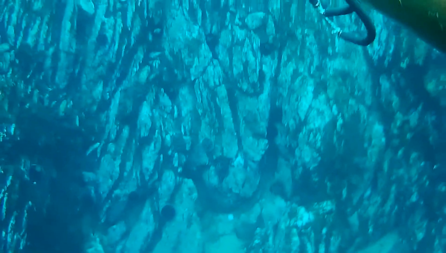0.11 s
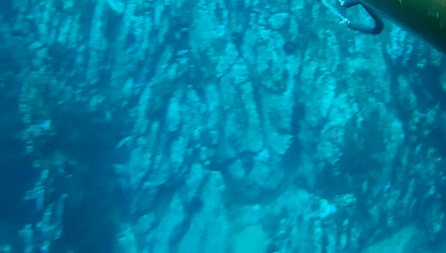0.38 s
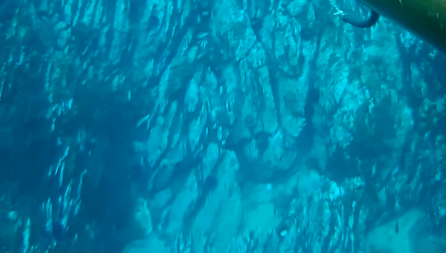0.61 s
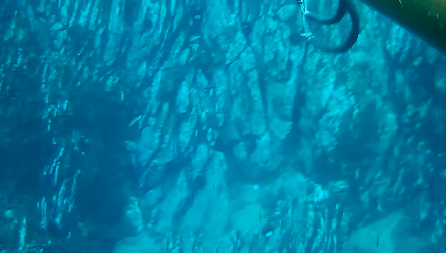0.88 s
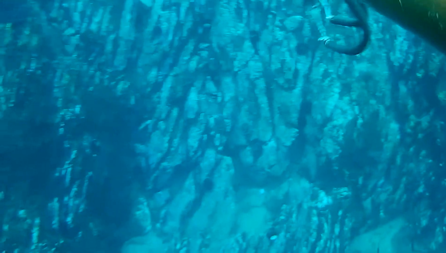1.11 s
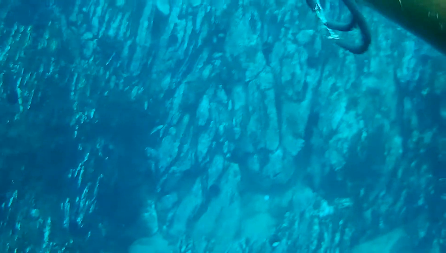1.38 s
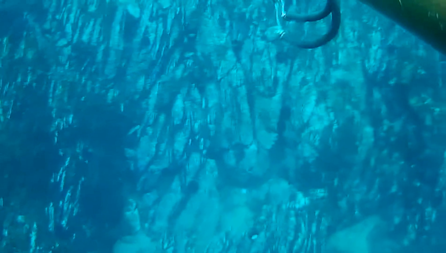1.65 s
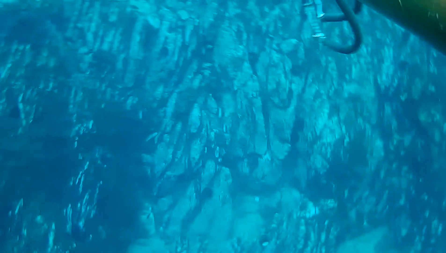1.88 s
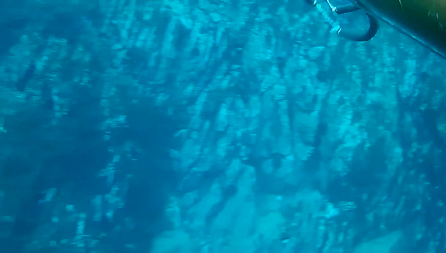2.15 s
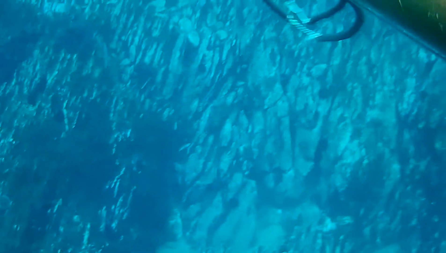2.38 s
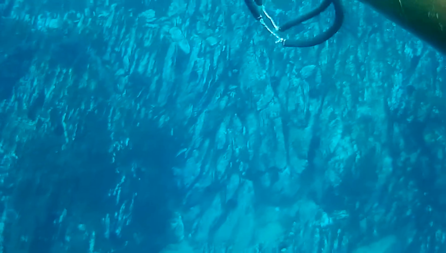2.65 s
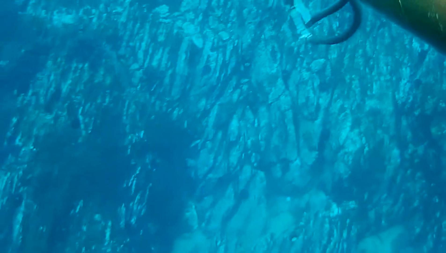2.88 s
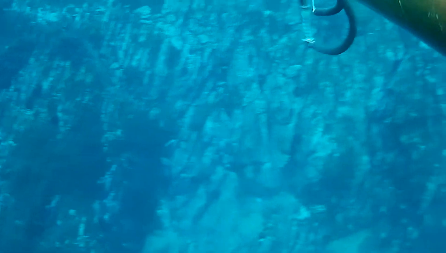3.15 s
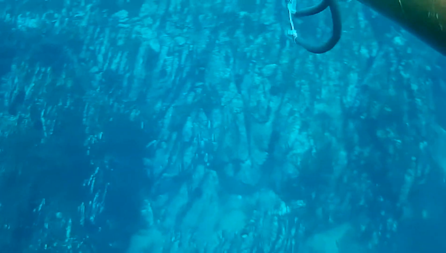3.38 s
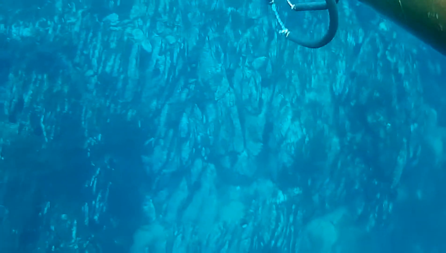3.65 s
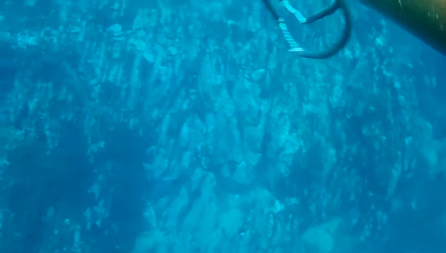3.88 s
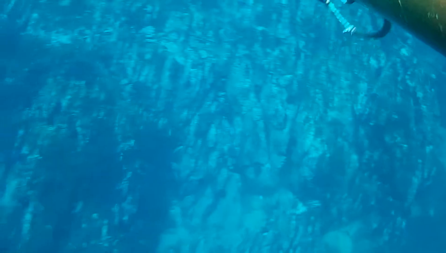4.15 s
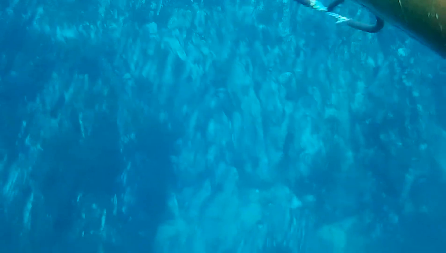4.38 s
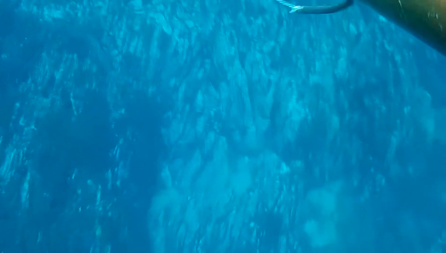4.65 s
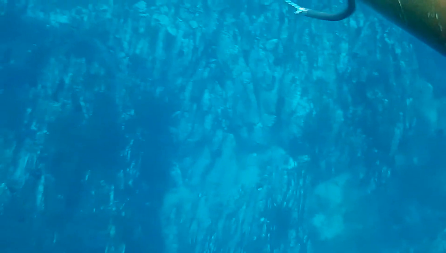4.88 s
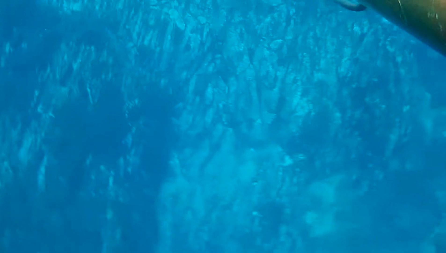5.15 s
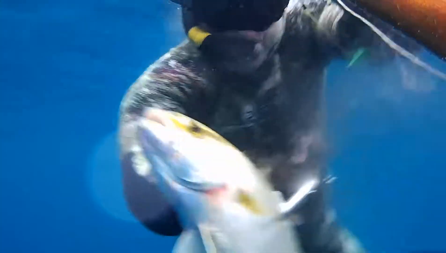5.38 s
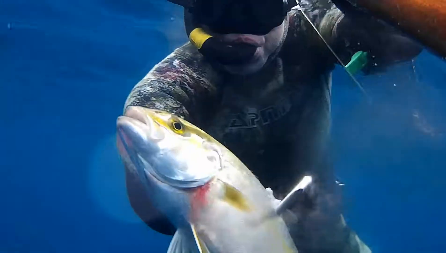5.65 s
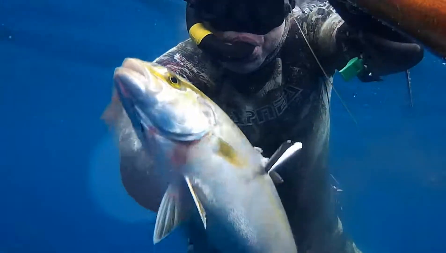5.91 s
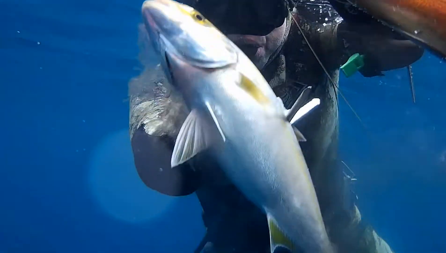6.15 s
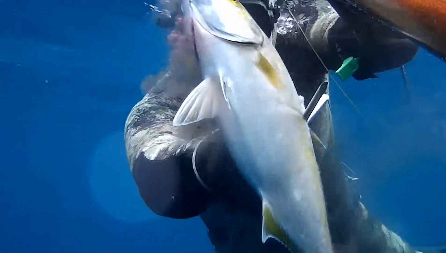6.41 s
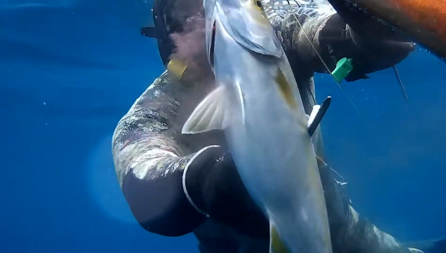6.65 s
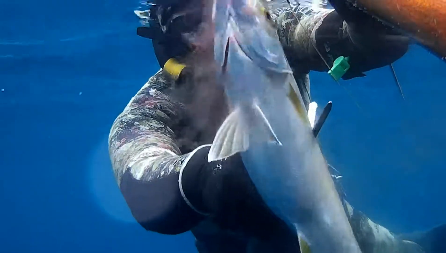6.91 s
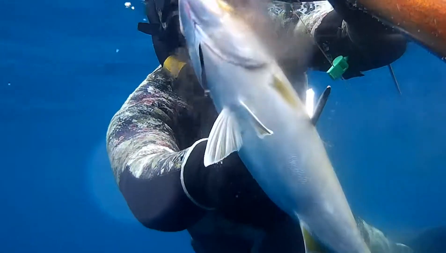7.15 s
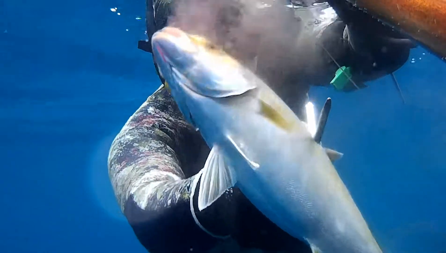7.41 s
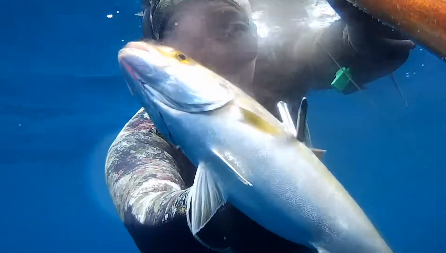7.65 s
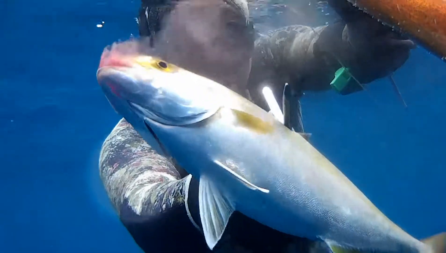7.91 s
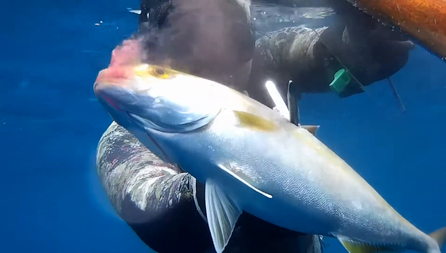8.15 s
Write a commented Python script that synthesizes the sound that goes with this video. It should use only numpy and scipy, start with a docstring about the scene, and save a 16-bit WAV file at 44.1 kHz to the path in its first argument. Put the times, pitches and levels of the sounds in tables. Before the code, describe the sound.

Muffled underwater handling of a wooden speargun: low barrel hum, rubbing line and gloves, dull knocks, short ratchety scrapes and small bubbles, then near quiet.

```python
"""Under water, a small camera in a sealed case is clamped to a wooden speargun, so its microphone rides the barrel.
From the start a faint wash of sea and a faint, evenly throbbing hiss lie under everything, the long barrel sways
with a low hum as the diver tugs the line, line and gloves rub it, and knocks ring its modes; small fittings soon tick.
From about 0.65 s air bubbles out now and then and the line ratchets over the barrel in short bursts; a lone click
falls at 5.15 s. After 5.7 s the tugs cease and the sway calms; past 6.4 s only faint rubs, knocks and ticks remain."""
import sys
import numpy as np
from scipy import signal
from scipy.fft import rfft, irfft
from scipy.io import wavfile
from scipy.ndimage import uniform_filter1d

SR = 44100
rng = np.random.default_rng(int(sys.argv[2]) if len(sys.argv) > 2 else 0)


def volts(x):
    """Linear amplitude factor 10**(x/20) for a level x in dB, scalar or array-like."""
    e = np.asarray(x, float) / 20
    return 10 ** e


def to_wav(sig):
    """Store sig (one row per channel, or 1-D mono) as 16-bit WAV at the path in sys.argv[1].

    Samples outside -1..1 are clipped; the rate is SR.
    """
    pcm = np.clip(np.atleast_2d(sig), -1, 1) * 32767
    pcm = np.round(pcm).astype(np.int16)
    wavfile.write(sys.argv[1], SR, pcm.T)  # frames by channels


N = 365148
T = np.arange(N) / SR


def level(x, db):
    """Scale to an rms level."""
    return x * volts(db) / np.sqrt(np.mean(x ** 2))


def walk(rate):
    """Random levels held 1 / rate s and slewed twice; spread near 1."""
    hold = int(SR / rate)
    steps = np.repeat(rng.standard_normal(N // hold + 1), hold)
    return 1.7 * uniform_filter1d(uniform_filter1d(steps, hold), hold)[:N]


def coloured(spectrum):
    """Noise shaped by a spectrum of (pitch_hz, density_db) points."""
    hz, db = np.transpose(spectrum)
    bins_hz = np.arange(N // 2 + 1) * SR / N + 1
    gain = volts(np.interp(np.log(bins_hz), np.log(hz), db))
    return irfft(rfft(rng.standard_normal(N)) * gain, N)


def ring(force, hz, t60):
    """One mode driven by a force; a unit blow rings with peak near 1 and falls 60 dB in t60 s."""
    radius = 1000. ** (-1 / (t60 * SR))
    turn = 2 * np.pi * hz / SR
    return signal.lfilter([0, np.sin(turn)], [1, -2 * radius * np.cos(turn), radius * radius], force)


def soft(force, top_hz):
    """Water and rubber round off every contact: a gentle low-pass."""
    return signal.sosfilt(signal.butter(2, top_hz, fs=SR, output="sos"), force)


def swells(start, held, db, attack, fade_db_s):
    """Gain over time of efforts that rise, hold and fade; their powers add."""
    power = np.zeros(N)
    for s, h, peak_db in zip(start, held, db):
        rise = np.clip((T - s) / attack, 0, 1) if s > 0 else 1  # an effort at 0 s is already up
        fade_db = fade_db_s * np.clip(T - s - attack - h, 0, 2)
        power += (rise * volts(peak_db - fade_db)) ** 2
    return np.sqrt(power)


def add(out, s, sound):
    """Mix a short sound in at a time."""
    i = int(s * SR)
    out[i:i + len(sound)] += sound[:N - i]


# wash of the open water around the gun: pitch_hz, density_db (relative)
WATER_SPECTRUM = [(24, -26), (50, -15), (155, -14), (302, -21.5), (440, -11), (514, -18.5), (749, -38.5),
                  (3000, -39), (3900, -39), (6600, -120)]


def sea():
    """Coloured noise whose strength wanders slowly, as water moving around the case."""
    return level(coloured(WATER_SPECTRUM) * volts(1.7 * walk(5.2)), -65)


# faint hiss over everything: pitch_hz, density_db (relative)
HISS_SPECTRUM = [(880, -4), (1500, -1.5), (1820, -3.5), (2090, -5.5), (14100, -8), (15500, -11)]


def faint_hiss():
    """Faint coloured noise, constant on the whole, with a small even throb about 21.5 times a second."""
    throb_hz = SR / 2048
    throb_db = 1.23 * np.tanh(10.0 * np.cos(2 * np.pi * throb_hz * (T - .0147)))
    return level(coloured(HISS_SPECTRUM) * volts(throb_db), -71)


# tugs on the line that bend the barrel: start_s, held_s, first_bending_db, second_bending_db
LINE_TUGS = [(0.0, 0.17, -36, -41.5), (0.419, 0.23, -33.5, -48.5), (0.78, 0.071, -36, -41),
             (1, 0.23, -36.5, -40), (1.331, 0.087, -30, -42), (1.569, 0.3, -30, -52),
             (2.72, 0.11, -43, -52), (2.86, 0.15, -34.5, -45.5), (3.17, 0.49, -42.5, -50.5),
             (4.17, 0.2, -41.5, -51.5), (4.99, 0.03, -37, -43.5), (5.142, 0.07, -26.5, -43),
             (5.27, 0.028, -28.5, -45), (5.57, 0.069, -37.5, -44), (5.71, 0.023, -43, -59)]


def sway():
    """Tugs set off two bending modes: the first wavers over a dull surge, the second is shaken unevenly."""
    first_hz, second_hz = 38.2, 73.45
    attack_s, first_fade_db_s, second_fade_db_s = 0.017, 96, 52
    start, held, first_db, second_db = np.transpose(LINE_TUGS)

    phase = 2 * np.pi * np.cumsum(first_hz * (1 + 0.0602 * walk(6.2))) / SR
    first = np.sqrt(2) * volts(1.5 * walk(14)) * np.sin(phase)
    surge = level(soft(ring(rng.standard_normal(N), 44.0, 0.1), 60), -13.0)
    second = level(ring(rng.standard_normal(N), second_hz, 0.63), 0)
    drift = level(soft(ring(rng.standard_normal(N), first_hz, 0.26), 70), -0.53)

    # between tugs the barrel sways a little, less and less once the diver calms down at 5.69 s
    idle = volts(-47.5 - 5 * np.maximum(T - 5.69, 0))
    bend = swells(start, held, first_db, attack_s, first_fade_db_s)
    tugged = swells(start, held, second_db, attack_s, second_fade_db_s)
    shake = np.hypot(tugged, idle * volts(-12.5))
    return bend * (first + surge) + idle * drift + shake * second


# modes of gun and case, before each contact weights them: pitch_hz, level_db (relative), t60_s
BODY_MODES = [(129, -19.5, 0.045), (164, -22, 0.23), (223, -13, 0.18), (282.9, -7, 0.21), (347, 2.5, 0.15),
              (437.1, -3, 0.2), (509.5, -8.5, 0.14), (610.3, -12, 0.048), (691, -13.5, 0.028),
              (792, -14.5, 0.045), (888, -17, 0.028), (1011, -30.5, 0.11), (1290, -16, 0.011),
              (1450, -28, 0.029), (1678, -25.5, 0.029), (1960, -39.5, 0.046), (2520, -38, 0.013),
              (3150, -28, 0.006), (3730, -39.5, 0.013)]
# strokes of line and gloves along the gun: start_s, held_s, effort_db, scratch_db (upper modes, on top of effort)
GLOVE_STROKES = [(0.0, 0.019, -37, -13), (0.13, 0.021, -42.5, -9.5), (0.22, 0.14, -46.5, -22),
                 (0.42, 0.27, -53, -13.5), (0.68, 0.28, -45.5, -5.5), (1.05, 0.65, -41, -17),
                 (1.8, 0.13, -45.5, -13), (1.98, 1.57, -58, -7), (2.722, 0.16, -48, -9.5),
                 (2.87, 0.12, -42, -14), (3.1, 0.34, -50.5, -8), (3.55, 0.42, -58.5, -5.5),
                 (3.96, 0.12, -51, -14), (4.31, 0.23, -60.5, 1.5), (4.5, 0.47, -58.5, -4.5),
                 (4.97, 0.088, -46, -5), (5.13, 0.24, -43, -19), (5.36, 0.17, -45, -8.5),
                 (5.6, 0.27, -55.5, -14), (5.97, 0.33, -52, -16), (6.4, 1.9, -76, 0.5)]
# each way of holding the gun frees other modes: from_s, mode_440_hz_db, mode_515_hz_db
HOLDS = [(0, -1, -11.5), (3.45, 9.5, -20.5), (5.05, -2.5, 6), (6.45, 9, -15)]


def rub():
    """Stick-slip grains in uneven bunches push every mode; the upper ones get sparser, harder slips."""
    attack_s, fade_db_s, regrip_s = 0.03, 108, 0.19
    start, held, effort_db, scratch_db = np.transpose(GLOVE_STROKES)
    since, *columns = np.transpose(HOLDS)
    hold = np.searchsorted(since, T, side="right") - 1
    freed = [uniform_filter1d(c[hold], int(regrip_s * SR)) for c in columns]
    freed_db = dict(zip((5, 6), freed))  # rows of the two modes in BODY_MODES

    bunches = volts(2.4 * walk(30))
    dense = rng.standard_normal(N) * volts(2.45 * np.minimum(rng.exponential(size=N), 6.5)) * bunches
    sparse = rng.standard_normal(N) * volts(3.55 * np.minimum(rng.exponential(size=N), 6)) * bunches
    # the highest modes answer only to the sharpest slips, so they crackle
    crackle = volts(3.5 * np.clip(walk(70), -2, 2))

    low, high = np.zeros(N), np.zeros(N)
    for k, (hz, mode_db, t60) in enumerate(BODY_MODES):
        patchy = volts(2.97 * walk(10))  # the touching point wanders over the mode shapes
        if hz > 560:
            slips = sparse * (crackle if hz > 1100 else 1)
            high_db = mode_db - 5 * (hz > 1100) - 6 * (hz > 2300)
            high += patchy * level(ring(soft(slips, 1.19 * hz), hz, t60), high_db)
        else:
            mode = level(ring(soft(dense, 1.28 * hz), hz, t60), mode_db)
            low += patchy * mode * volts(freed_db.get(k, 0))

    press = swells(start, held, effort_db, attack_s, fade_db_s)
    scratch = swells(start, held, effort_db + scratch_db, attack_s, fade_db_s)
    return press * volts(-6) * low + scratch * level(high, 0)


def blow(gains_db, rise, chance, lasting=1):
    """A contact: all modes swell in together, slightly detuned, each with its own strength; peak 1."""
    hz, _, t60 = np.array(BODY_MODES).T[:, :, None]
    t = np.arange(int(.3 * SR)) / SR
    phase = 2 * np.pi * hz * (1 + 0.014 * chance[0, :, None]) * t
    strength = volts(gains_db + 4.4 * chance[1])[:, None]
    rings = strength * np.sin(phase) * 1000. ** (-t / (lasting * t60))
    swell = np.sin(np.pi / 2 * np.clip(t / max(rise, 2e-4), 0, 1)) ** 2
    sound = rings.sum(axis=0) * swell
    return sound / np.abs(sound).max()


# dull knocks on the barrel (each swells in from 4 ms before its time):
# time_s, peak_db, favoured_mode_hz, hardness_db
DULL_KNOCKS = [(0.055, -33, 346, -29), (0.154, -30.5, 331, -19.5), (0.192, -28.5, 352, -11.5),
               (0.435, -45, 852, -20), (0.641, -40.5, 437, -18.5), (0.924, -35, 346, -33),
               (0.999, -33.5, 362, -31), (1.081, -33.5, 347, -37), (1.153, -29, 346, -23),
               (1.187, -33, 355, -23), (1.231, -28.5, 345, -43.5), (1.305, -38.5, 347, -12),
               (1.344, -34, 359.4, -16.5), (1.427, -30.5, 347, -14.5), (1.537, -40, 436, -22),
               (1.804, -26, 347, -32), (1.922, -28, 367, -20), (2.886, -23, 347, -16),
               (2.986, -30, 347, -15), (3.13, -45.5, 347, -33), (3.187, -45, 346, -27),
               (3.224, -40.5, 347, -21), (3.305, -33.5, 330, -33), (3.38, -34.5, 457, -17.5),
               (3.537, -36.5, 438, -18.5), (3.793, -38.5, 270, -21.5), (4.214, -36, 440, -43),
               (4.32, -26.5, 437, -36.5), (4.475, -42, 440, -38), (4.515, -32, 327, -19.5),
               (4.702, -42, 863, -20), (4.728, -38.5, 437, -25), (4.944, -39, 352, -36),
               (5.009, -39, 345, -20), (5.094, -26, 325, -37.5), (5.154, -33.5, 126.5, -31),
               (5.278, -35.5, 484.5, -27), (5.524, -35.5, 353, -44), (5.93, -46.5, 352, -10),
               (5.991, -34.5, 534.4, -34.5), (6.076, -40, 502, -17.5), (6.137, -38.5, 530, -27.5),
               (6.261, -43.5, 440, -38), (6.383, -31.5, 492, -18.5), (6.403, -66, 445, -4),
               (7.274, -48.5, 347, -13), (7.466, -50.5, 308, -22), (8.078, -46, 347, -9.5)]


def knocks():
    """A knock's place favours one mode, most if soft; a harder one is quicker, brighter and dies sooner."""
    out, (hz, db, _) = np.zeros(N), np.transpose(BODY_MODES)
    chances = rng.standard_normal((len(DULL_KNOCKS), 2, len(BODY_MODES)))
    for (s, peak_db, near_hz, hard_db), chance in zip(DULL_KNOCKS, chances):
        place_db = (5.5 - 0.99 * hard_db) * np.exp(-(np.log(hz / near_hz) / 0.051) ** 2)
        place_db -= 15 * (near_hz > 600) * (hz < 560)  # a small loose part leaves the barrel still
        bright_db = (hz > 560) * (hard_db + 39) - 15 * (hz > 2300)
        rise = 0.0034 * volts(-.4 * hard_db)
        lasting = volts(-0.15 * (hard_db + 32))
        add(out, s - .004, volts(peak_db) * blow(db + place_db + bright_db, rise, chance, lasting))
    return out


def gritty(sound, length):
    """A contact that chatters for a moment: the sound is struck many times, fading; peak 1."""
    t = np.arange(int(.06 * SR)) / SR
    chatter = rng.standard_normal(len(t)) ** 3 * np.exp(-t / max(length, 1e-4))
    out = signal.fftconvolve(sound, chatter)[:len(sound)]
    return out / np.abs(out).max()


# ticks of small fittings, save the row at 5.1532 s: a lone click that is no fitting, made the same way
# (each starts 1.2 ms before its time): time_s, peak_db, favoured_mode_hz, top_end_db
TICKS_AND_CLICK = [(0.1876, -49, 1220, -23), (0.601, -46, 1450, -11), (0.636, -55, 1450, -4),
                   (1.279, -48.5, 1450, -27.5), (1.355, -56, 1380, -31), (1.4036, -53, 1284, -31),
                   (1.506, -53.5, 1450, -24), (1.608, -55.5, 1450, -22), (1.6976, -45.5, 1410, -19),
                   (1.8882, -47.5, 1700, -23.5), (1.932, -42, 1300, -28), (2.236, -53, 1450, -1),
                   (2.4472, -53.5, 1280, -19), (2.4973, -57, 1530, -24), (2.8927, -45.5, 1250, -28),
                   (3.478, -52.5, 1960, -19), (3.685, -56.5, 1450, -6), (4.0994, -56, 1450, -13),
                   (4.392, -52, 1450, -2), (4.5102, -60, 1450, -3), (4.5326, -52, 1590, -8),
                   (4.547, -51, 1450, -22), (4.563, -57, 1450, -24), (5.1532, -51, 1670, -14),
                   (5.317, -50, 1250, -13), (5.492, -49, 1290, -21), (5.522, -51, 1270, -16),
                   (6.1, -52.5, 1450, -8), (6.1565, -52, 1770, -13), (6.1774, -50.5, 1350, -12),
                   (6.276, -57, 1730, -25), (6.3006, -47, 1960, -29), (6.342, -54, 1300, -28),
                   (6.3836, -40, 1290, -34), (6.464, -48, 1740, -9), (6.8482, -50.5, 1680, -11),
                   (7.9027, -56.5, 1810, -3), (8, -53.5, 1410, -10)]


def ticks():
    """Light hard contacts cannot move the low modes; duller ones chatter longer. One lone click is made alike."""
    out, (hz, db, _) = np.zeros(N), np.transpose(BODY_MODES)
    chances = rng.standard_normal((len(TICKS_AND_CLICK), 2, len(BODY_MODES)))
    for (s, peak_db, near_hz, top_db), chance in zip(TICKS_AND_CLICK, chances):
        place_db = 6 * np.exp(-(np.log(hz / near_hz) / 0.026) ** 2)
        low_cut_db = 30 * np.clip(np.log2(1250 / hz), 0, 3)
        gains_db = db + place_db - low_cut_db + (hz > 2300) * (top_db + 26.5)
        chatter_s = min(0.001 * volts(-.7 * top_db), 0.004)
        add(out, s - .0012, volts(peak_db) * gritty(blow(gains_db, 0.0011, chance), chatter_s))
    return out


# trapped air squeezing out: start_s, level_db (the envelope tops out 2.3 dB lower), pitch_hz (nominal)
AIR_BUBBLES = [(0.648, -58, 1160), (2.727, -46, 922), (3.01, -55, 1250), (3.19, -52, 875),
               (3.455, -52.5, 936), (4.213, -55.5, 900), (4.339, -47.5, 913), (4.368, -54, 1065),
               (4.467, -54.5, 1056), (4.618, -60, 1386)]


def bubbles():
    """Each bubble is a short tone that glides up a little."""
    out, t = np.zeros(N), np.arange(int(.08 * SR)) / SR
    shape = t / 0.0091 * np.exp(1 - t / 0.007)
    for start, level_db, hz in AIR_BUBBLES:
        tone = np.sin(2 * np.pi * hz * t * (0.987 + 0.29 * t))
        add(out, start, volts(level_db) * shape * tone)
    return out


# the line ratchets over the barrel:
# start_s, end_s, level_db (typical slip peak), first_slips_per_s, lift_db_per_octave
LINE_SCRAPES = [(0.694, 0.73, -43, 260, 6), (0.763, 0.794, -43, 246, 6), (0.804, 0.821, -44.5, 300, 19),
                (0.862, 0.88, -39.5, 300, 12.5), (0.914, 0.928, -39, 250, 13),
                (0.988, 1.01, -44.5, 250, 14.5), (1.744, 1.86, -45.5, 220, -15.5),
                (2.709, 2.79, -51, 182, 18), (3.88, 3.963, -32.5, 78, 10.5), (4.981, 5.14, -52, 158, 4),
                (5.444, 5.54, -42.5, 190, 12.5), (6.257, 6.313, -47, 130, -3)]


def scrapes():
    """Uneven trains of hard slips ring all modes, the upper ones tilted up or down."""
    out, (hz, db, _) = np.zeros(N), np.transpose(BODY_MODES)
    for start, end, scrape_db, rate, tilt_db in LINE_SCRAPES:
        lift_db = tilt_db * np.log2(np.clip(hz, 950, 2000) / 750)
        gains_db = db + lift_db - 6 * (db > -3)  # the strongest mode is held back
        for chance in rng.standard_normal((40, 3, len(BODY_MODES))):
            if start < end:
                slip_db = scrape_db + 1.5 * chance[2, 0]
                add(out, start, volts(slip_db) * blow(gains_db, .001, chance, .85))
            start += np.exp(0.1375 * chance[2, 1]) / rate
            rate *= 1.13  # the line speeds up as it runs
    return out


def scene():
    """Gun sounds over the faint wash of the sea."""
    return (sea() + sway() + rub() + knocks() + ticks() + bubbles() + scrapes())[None]


def top_cut(x):
    """Nothing passes above the cut-off."""
    return signal.sosfilt(signal.butter(12, 15660, fs=SR, output="sos"), x)


def record(dry):
    """A faint hiss lies over what reaches the microphone on the gun."""
    mix = dry + faint_hiss()
    return top_cut(mix)


dry = scene()
out = record(dry)
to_wav(out)
```